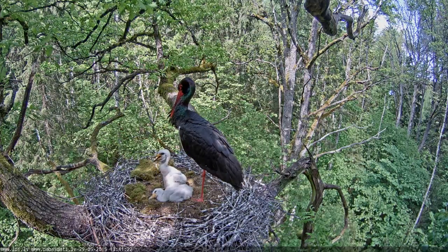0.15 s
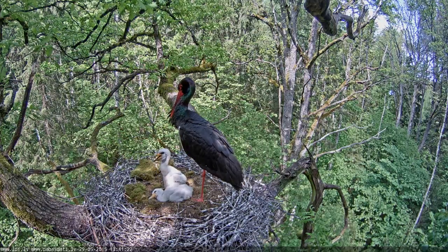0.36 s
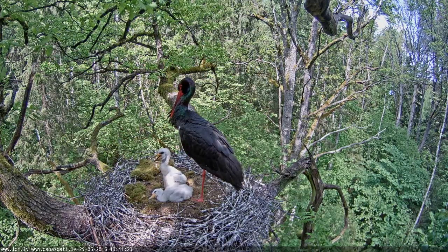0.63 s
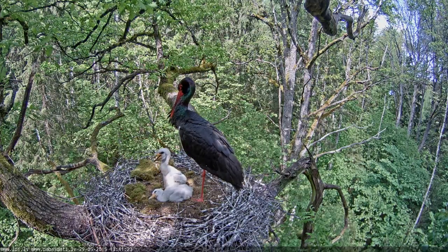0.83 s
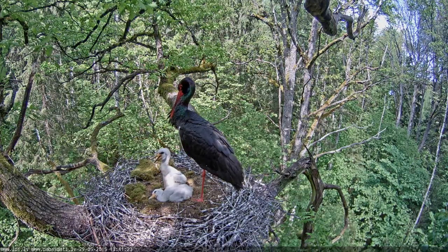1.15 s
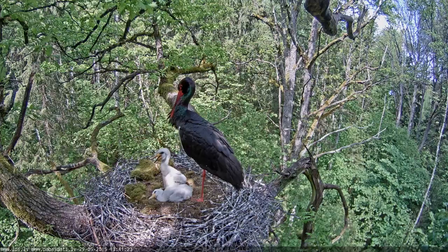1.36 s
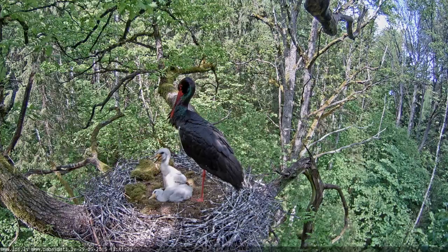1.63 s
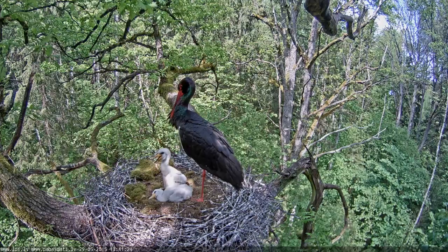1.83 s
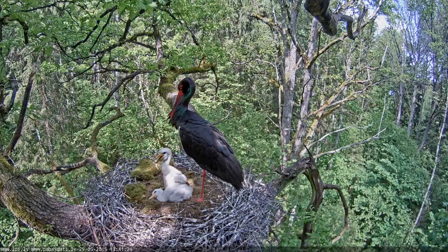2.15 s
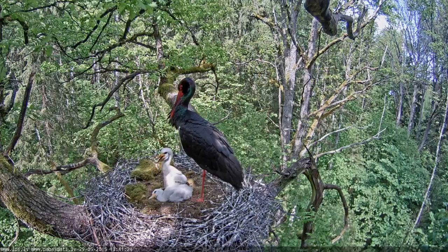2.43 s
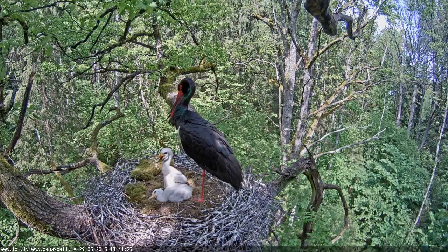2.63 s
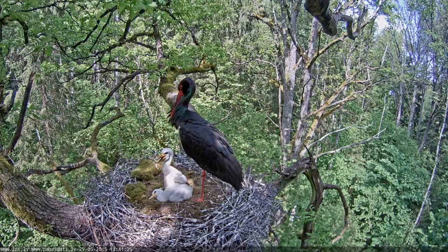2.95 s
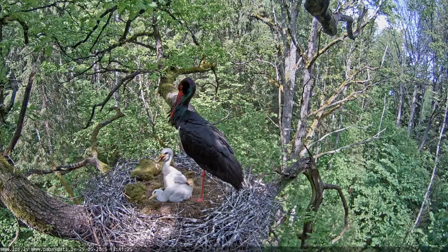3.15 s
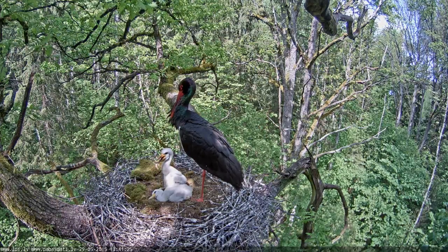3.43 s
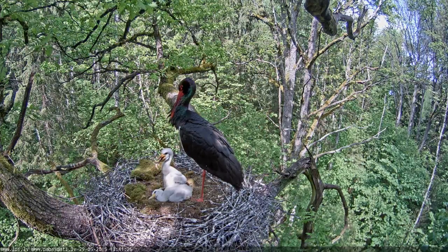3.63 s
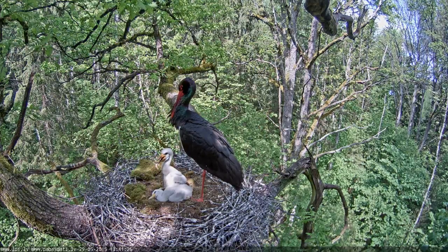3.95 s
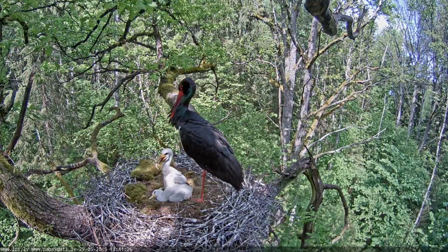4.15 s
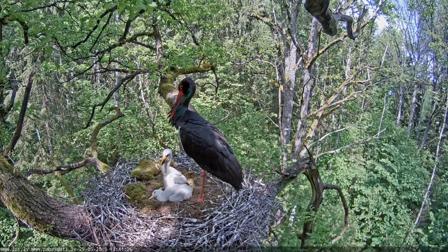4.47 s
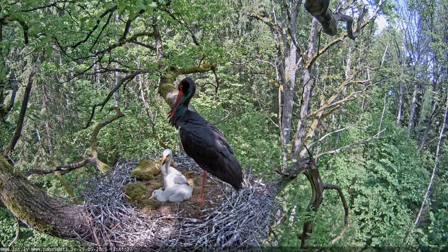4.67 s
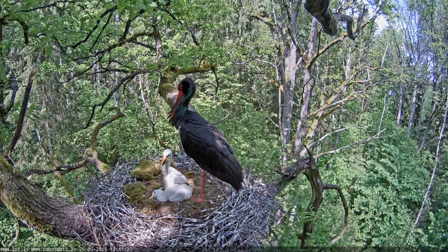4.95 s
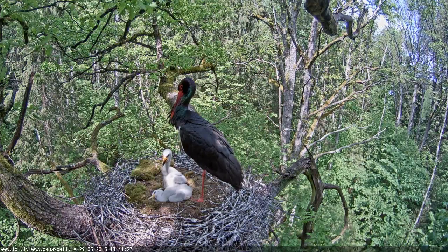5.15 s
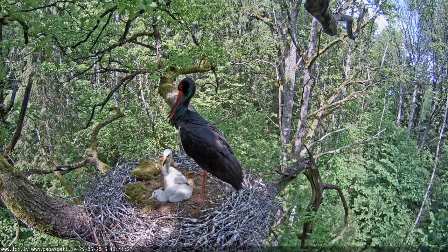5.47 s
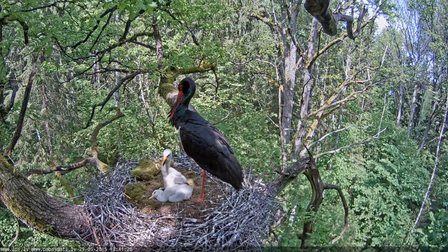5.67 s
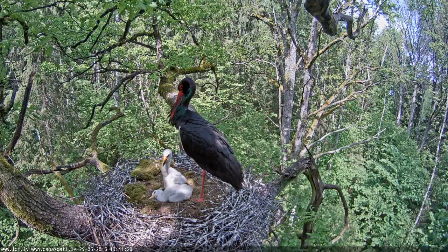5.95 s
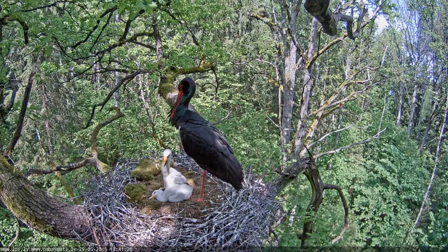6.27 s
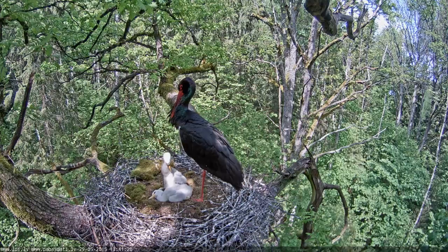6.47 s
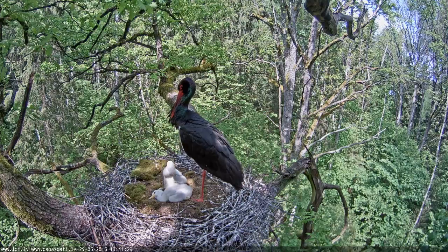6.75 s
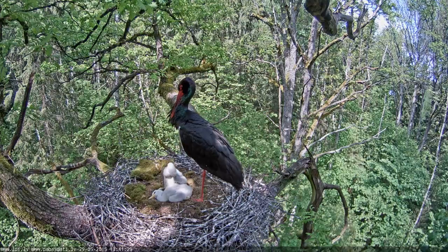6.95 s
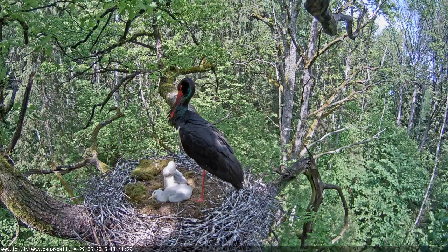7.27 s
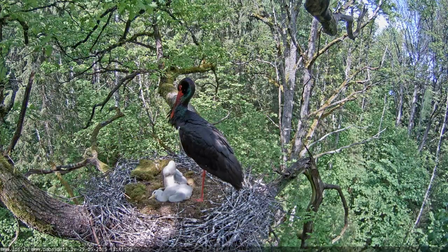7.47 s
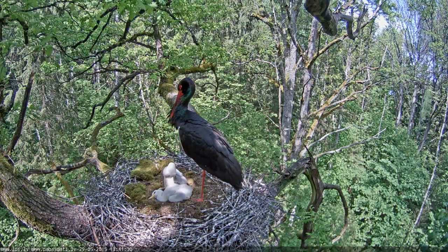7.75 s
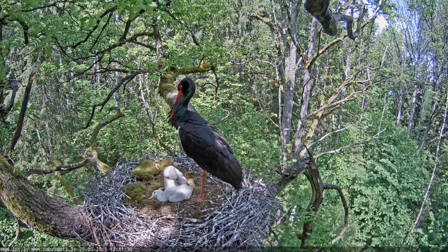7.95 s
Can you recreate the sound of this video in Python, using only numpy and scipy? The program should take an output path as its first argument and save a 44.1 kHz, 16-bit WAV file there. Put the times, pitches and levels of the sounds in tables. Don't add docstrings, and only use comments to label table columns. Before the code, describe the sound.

Steady hiss of leaves and a distant bird chorus lies under everything, with faint fast electrical ticking. Sparse thin calls lead into chopped churrs and quick leaping chirps, followed by bright, pure whistles close by that glide up and down. A high thin trill follows near the end. Tiny throat gulps and one low coo come from the stork nest beside the microphone, with woodland reverberation around.

```python
import sys
import numpy as np
from scipy import signal
from scipy.io import wavfile

SR = 44100
rng = np.random.default_rng(int(sys.argv[2]) if len(sys.argv) > 2 else 0)


def amplitude_ratio(level_db):
    exponent = np.asarray(level_db, float) / 20
    return 10 ** exponent


def file_out(sig):
    cols = np.atleast_2d(sig).T
    lim = np.clip(cols, -1, 1)
    pcm = np.round(lim * 32767).astype(np.int16)
    wavfile.write(sys.argv[1], SR, pcm)


N = 357651

GLIDE_BY_MIDDLE = 0.654


def at_hz(points, hz):
    points_hz, values = np.transpose(points)
    return np.interp(np.log(hz), np.log(points_hz), values)


def rms_one(x):
    return x / np.sqrt(np.mean(x ** 2) + 1e-20)


def energy_one(x):
    return x / np.sqrt(np.sum(x ** 2))


def drift(rate_hz, size):
    run_in = 4000
    r = np.exp(-2 * np.pi * rate_hz / SR)
    slow = signal.lfilter([1], [1, -2 * r, r * r], rng.standard_normal(size + run_in))
    return rms_one(slow[run_in:])


def bands(order=2):
    edges_hz = 16 * 2 ** (np.arange(31) / 3)
    return [(np.sqrt(a * b), signal.butter(order, [a, b], "band", fs=SR, output="sos"))
            for a, b in zip(edges_hz, edges_hz[1:])]


def add(out, start_s, hz, gain):
    at = round(start_s * SR)
    tone = np.sqrt(2) * gain * np.sin(2 * np.pi * np.cumsum(hz) / SR)
    out[at:at + len(tone)] += tone[:N - at]


def whistles():
    # time [share of length], glide [share done], level [dB re peak]
    arc = [(0, 0.016, -6), (.28, 0.419, -4), (.55, .95, -2.5), (.8, 1.05, -1.5), (1, 0.34, -13)]
    fade = [(0, 0, -11), (.15, 0.41, -2.5), (.6, .6, -5), (1, 0.66, -16)]
    flick = [(0, 0, -11), (.35, 0.5, -3.5), (1, 1, -3.5)]
    # start [t/s], length [t/s], first [f/Hz], last [f/Hz], peak [level/dB]
    arcs = [
        (3.94, 0.13, 1680, 2028, -48.5),
        (3.966, 0.11, 3420, 3595, -40),
        (3.99, .075, 5420, 5640, -67),
    ]
    fades = [
        (3.896, 0.05, 2613, 2668, -34.5),
    ]
    flicks = [
        (5.668, 0.032, 2740, 2396, -33.5),
        (5.677, 0.0243, 3994, 3330, -40),
        (6.067, 0.0119, 4505, 3250, -40),
        (6.131, 0.0093, 2350, 2590, -25.5),
    ]
    # [t/s], pitch [f/Hz], [level/dB]
    once = [
        [(3.675, 2890, -53), (3.7, 2770, -37.5), (3.712, 2710, -41), (3.73, 2694, -26.5), (3.739, 2580, -26.5),
         (3.747, 2617, -28), (3.762, 2582, -24), (3.775, 2634, -26.5), (3.788, 2535, -28)],
        [(5.728, 2300, -43), (5.74, 2507, -29), (5.757, 2754, -26), (5.77, 2834, -35.5), (5.785, 3170, -36)],
        [(5.826, 3330, -35), (5.838, 3050, -31), (5.847, 2875, -38), (5.858, 2855, -22), (5.862, 2840, -28),
         (5.868, 2880, -22.5), (5.875, 2800, -33), (5.881, 2955, -31), (5.895, 2990, -41)],
        [(6.086, 2930, -34), (6.093, 2575, -26), (6.1, 2423, -31.5), (6.104, 2295, -39), (6.112, 2110, -38),
         (6.124, 2070, -44), (6.13, 2224, -53)],
    ]
    drops = [
        [(4.279, 2646, -49), (4.287, 2714, -37.5), (4.299, 2520, -27), (4.311, 2390, -39), (4.317, 2240, -32.5),
         (4.337, 1880, -37), (4.343, 1780, -52), (4.349, 1899, -54)],
        [(4.903, 2840, -50), (4.917, 2683, -28), (4.933, 2536, -24), (4.943, 2410, -32), (4.953, 2010, -35.5),
         (4.967, 1826, -33.5), (4.98, 1830, -54)],
    ]
    rises = [
        [(4.461, 2520, -41), (4.473, 2600, -37), (4.522, 2720, -26), (4.538, 2870, -27.5), (4.562, 2920, -26.5),
         (4.574, 3030, -38.5), (4.596, 3100, -31), (4.62, 3220, -49), (4.7, 3170, -34.5)],
        [(5.102, 2480, -48), (5.117, 2650, -33), (5.14, 2720, -30.5), (5.166, 2815, -25.5), (5.186, 2900, -36),
         (5.218, 3030, -27), (5.25, 3150, -36.5), (5.28, 3220, -47), (5.344, 3130, -32.5)],
    ]
    shaped = []
    for shape, rows in [(arc, arcs), (fade, fades), (flick, flicks)]:
        for s, length, first, last, peak in rows:
            shaped.append([(s + length * u, first + (last - first) * glide, peak + under)
                           for u, glide, under in shape])
    return sorted(shaped + list(once) + list(drops) + list(rises), key=lambda note: note[0][0])


def whistler():
    turned_away = [-13, -3.5, -2, -8.5, -10.0, -10, -7, -10, -6.5, -5, 1, -9.5, -7, -5, -8.5, -21]
    away_swing = 0.58
    here, away = np.zeros(N), np.zeros(N)
    for note, away_db in zip(whistles(), turned_away):
        s, hz, level_db = np.transpose(note)
        t = np.arange(s[0], s[-1], 1 / SR)
        gate = np.clip(np.minimum(t - s[0], s[-1] - t) / .003, 0, 1)
        tone = np.zeros(N)
        add(tone, s[0], np.interp(t, s, hz), gate * amplitude_ratio(np.interp(t, s, level_db)))
        below_peak_db = np.interp(t, s, level_db - level_db.max())
        evened = np.zeros(N)
        evened[round(s[0] * SR):][:len(t)] = amplitude_ratio((away_swing - 1) * below_peak_db)
        here = here + tone
        away = away + amplitude_ratio(away_db - 2.0) * evened * tone
    return here, away


def sing(rows, wobble, wobble_hz=60, buzz=0., buzz_hz=120, sweep=0., edge=.2):
    out, waver = np.zeros(N), drift(wobble_hz, N)
    for start_s, length_s, first_hz, middle_hz, last_hz, level_db in rows:
        u = np.linspace(0, 1, round(length_s * SR))
        cycle = 2 * np.pi * buzz_hz * length_s * u
        at = min(round(start_s * SR), N - len(u))
        hz = np.polyval(np.polyfit([0, .5, 1], [first_hz, middle_hz, last_hz], 2), u)
        hz = hz * (1 + wobble * waver[at:][:len(u)] - sweep * np.cos(cycle))
        swell = np.sin(np.pi / 2 * np.clip(np.minimum(u, 1 - u) / edge, 0, 1))
        chop = 1 + np.clip(buzz, 0, 1) * np.sin(cycle)
        add(out, start_s, hz, amplitude_ratio(level_db) * swell * chop)
    return out


def glides(rows, by_middle=GLIDE_BY_MIDDLE):
    return [(s, length, first, first + by_middle * (last - first), last, level)
            for s, length, first, last, level in rows]


def syllables(strands, sung, by_middle=GLIDE_BY_MIDDLE):
    rows = [(s + slow * after, slow * length, up * first, up * last, level + rel)
            for s, level, up, slow in sung
            for after, length, first, last, rel in strands]
    return glides(rows, by_middle)


def held(rows, start=0.99):
    return glides([(s, length, start * hz, hz, level) for s, length, hz, level in rows])


def warbler_leaps():
    leaps = [(1.345, 0.0077, 2140, 2600, -36), (1.356, 0.014, 2800, 2640, -38),
             (1.38, .026, 2720, 2700, -49), (1.404, 0.013, 3440, 3150, -41.5),
             (1.405, .012, 1690, 2000, -52), (1.485, 0.016, 1700, 1840, -51),
             (1.494, 0.02, 2800, 3780, -42.5), (1.504, 0.036, 2630, 3300, -50),
             (1.588, 0.014, 2600, 2310, -44), (1.652, 0.016, 3100, 3560, -42),
             (1.258, .01, 2400, 2900, -46), (1.31, .012, 2950, 3150, -52), (1.2, .02, 2350, 2500, -48),
             (2.562, 0.02, 2450, 2650, -42), (2.435, .012, 1700, 1850, -50),
             (2.678, 0.014, 3550, 3850, -52), (2.625, 0.01, 2850, 3100, -54),
             (2.875, .025, 3100, 3700, -50), (2.672, 0.055, 2660, 2400, -49),
             (2.281, 0.016, 3850, 3900, -57), (2.72, .012, 3600, 3150, -45), (3, 0.038, 4370, 4000, -59),
             (2.755, 0.0186, 2940, 3730, -41), (2.778, 0.021, 3550, 3030, -46),
             (2.846, 0.017, 2300, 3100, -41.5)]
    strokes = [
        (1.585, 0.042, 4480, 4020, -53),
        (2.49, 0.018, 4370, 3930, -50),
        (2.595, 0.024, 1630, 2060, -49),
        (2.597, 0.014, 2930, 3330, -40),
        (2.628, 0.0087, 4000, 3200, -41.5),
        (5.971, .014, 5800, 4150, -53),
        (6.415, 0.0215, 3090, 2440, -45.5),
        (7.81, 0.0096, 2460, 2850, -47),
        (7.895, 0.012, 2490, 2900, -48),
    ]
    rows = glides(leaps, by_middle=0.66) + glides(strokes)
    return sing(rows, wobble=.012, wobble_hz=170, buzz=.35, buzz_hz=110)


def warbler_churrs():
    strands = [(2.581, .022, 2600, 2720, -39), (1.5, 0.0306, 3500, 3800, -49),
               (1.67, .045, 2900, 3000, -49), (2.8, 0.051, 2950, 3200, -49), (1.5, 0.033, 2650, 2700, -48),
               (1.555, .03, 3000, 3100, -50), (2.525, 0.02, 2700, 2750, -48),
               (2.76, 0.057, 3700, 3760, -50.5), (2.74, 0.052, 3150, 3250, -46),
               (1.52, 0.021, 3900, 3340, -45), (1.608, 0.0456, 2400, 2680, -40),
               (1.62, 0.046, 1800, 1900, -49.5), (1.664, 0.026, 3600, 3350, -42),
               (1.698, 0.047, 2520, 2420, -41.5), (1.69, .06, 1750, 1900, -53.5),
               (1.735, 0.032, 2550, 3000, -48), (1.71, 0.048, 3450, 3250, -46),
               (1.758, 0.0295, 3250, 3750, -45.5), (1.788, 0.04, 3550, 3550, -51),
               (2.712, .05, 1740, 2050, -48.5), (2.762, .03, 2000, 1800, -51),
               (2.72, 0.034, 2450, 2680, -38.5), (2.885, 0.033, 2200, 1900, -51),
               (2.8, 0.038, 2620, 2450, -48), (2.835, 0.05, 1800, 2070, -47.5),
               (2.86, 0.039, 2960, 3750, -46), (2.92, 0.0298, 2900, 3624, -49)]
    # after [t/s], length [t/s], first [f/Hz], last [f/Hz], [level/dB]
    long_churr = [
        (0, 0.055, 2680, 2597, 0),
        (.056, .018, 2555, 2850, 0),
    ]
    # start [t/s], [level/dB], pitch factor [1], length factor [1]
    long_sung = [
        (1.42, -39, 1.015, 0.996),
    ]
    short = sing(glides(strands), wobble=.018, wobble_hz=120, buzz=.9, buzz_hz=125, sweep=.03)
    long = sing(syllables(long_churr, long_sung), wobble=.015, wobble_hz=90, buzz=.35, buzz_hz=50, sweep=.022)
    return short + long


def warbler_steady():
    level_notes = [(1.165, 0.03, 4260, -58), (1.362, 0.044, 2197, -42), (1.503, 0.018, 2120, -46),
                   (1.745, 0.033, 2140, -43.5), (2.281, 0.015, 2460, -46), (2.46, 0.031, 2322, -34.5),
                   (2.535, 0.031, 2294, -48), (2.612, 0.02, 4090, -47.5), (3.725, 0.067, 2090, -54),
                   (6.862, 0.048, 3620, -57), (7.088, .045, 3650, -56.5), (.12, .075, 3380, -54),
                   (.23, .055, 3370, -52), (.165, .03, 4000, -56), (.82, .1, 3760, -58)]
    # after [t/s], length [t/s], first [f/Hz], last [f/Hz], [level/dB]
    pickup = [
        (-.026, 0.019, 2300, 2620, -14),
        (0, 0.015, 2340, 2760, 4),
        (.021, 0.012, 2800, 2850, -3.5),
    ]
    # start [t/s], [level/dB], pitch factor [1], length factor [1]
    pickup_sung = [
        (2.439, -35, 1.01, 0.76),
    ]
    rows = held(level_notes) + syllables(pickup, pickup_sung)
    return sing(rows, wobble=.005, wobble_hz=80, buzz=.2, buzz_hz=95)


def brisk_syllables():
    # after [t/s], length [t/s], first [f/Hz], last [f/Hz], [level/dB]
    opening = [
        (0, 0.013, 4520, 4420, -4),
        (.032, .008, 7100, 5600, -14),
        (.034, 0.011, 5480, 5400, -5.5),
        (.042, .008, 4800, 4300, 0.5),
        (.05, 0.0157, 4250, 3580, -2),
        (.064, 0.011, 3600, 3550, -4),
    ]
    chip = [
        (-.016, 0.0236, 2350, 2400, -5.5),
        (.002, 0.01, 2700, 3740, -0.5),
        (.008, .008, 3600, 3500, -3.5),
        (.006, 0.014, 1600, 2060, -5.5),
        (.02, .012, 1800, 1750, -9),
        (.014, .014, 4250, 4450, -6),
        (.027, 0.01, 4200, 3900, -1.5),
    ]
    # start [t/s], [level/dB], pitch factor [1], length factor [1]
    songs = [
        (6.394, -51.5, 1.01, 1.05),
        (7.787, -52.5, .99, .95),
    ]
    chips = [
        (1.189, -44.5, 1.01, 1.1),
        (2.268, -45, .99, .9),
    ]
    far_sweeps = [
        (.245, 0.015, 4500, 3870, -51),
        (.338, 0.0215, 2640, 3020, -53),
        (.36, 0.037, 2900, 3070, -52),
        (.415, 0.022, 4100, 4450, -55),
        (.535, 0.028, 3950, 3600, -58),
        (.587, 0.011, 4600, 4150, -56),
        (.632, 0.031, 3120, 3380, -52),
        (.745, 0.026, 5150, 4150, -59),
        (.81, 0.036, 3640, 3740, -56),
        (7.468, 0.055, 3550, 3380, -55),
    ]
    rows = syllables(opening, songs, by_middle=0.573) + syllables(chip, chips) + glides(far_sweeps)
    return sing(rows, wobble=.022, wobble_hz=220, buzz=.45, buzz_hz=130)


def twitter_trill():
    trill = [(6.53, 0.06, 5300, -65), (6.515, 0.026, 6600, -59), (6.535, .05, 6380, -58.5),
             (6.545, 0.018, 7200, -56), (6.59, 0.061, 5500, -66), (6.6, 0.073, 6140, -64),
             (6.625, 0.072, 7240, -61), (6.67, .025, 6400, -65), (6.73, 0.016, 6580, -60),
             (6.73, 0.066, 7300, -62), (6.765, .015, 7900, -66), (6.88, 0.04, 5600, -68),
             (6.89, 0.065, 7250, -59), (6.89, 0.014, 6420, -61), (6.925, .02, 8020, -62),
             (7.82, 0.024, 6440, -64), (7.905, 0.048, 5420, -58), (7.905, 0.018, 4560, -58),
             (7.935, 0.031, 6740, -59), (7.95, 0.046, 4950, -68), (7.97, 0.037, 6100, -62),
             (8.02, .025, 5720, -59), (8.02, 0.064, 7170, -57.5), (8.04, 0.055, 6290, -64),
             (8.06, 0.045, 5400, -71)]
    return sing(held(trill), wobble=.027, wobble_hz=330, buzz=.7, buzz_hz=70, sweep=.015)


def far_calls():
    level_calls = [(.08, 0.02, 4400, -60), (.35, 0.051, 3870, -59), (.95, 0.035, 2900, -64),
                   (1.0, 0.045, 2850, -59), (.36, .07, 3420, -64), (1.21, .018, 5250, -64),
                   (2.2, 0.053, 3750, -60.5), (3.26, 0.05, 3780, -59.5), (3.74, 0.09, 3740, -57),
                   (7.52, 0.037, 3400, -60), (7.61, .04, 3450, -61), (7.8, .04, 3480, -61),
                   (7.56, 0.061, 3460, -60), (7.66, 0.071, 3436, -58.5), (7.745, 0.071, 3460, -58.5),
                   (7.85, .035, 3430, -63)]
    falling = [
        (.09, 0.038, 4640, -62),
        (.442, 0.05, 4680, -61),
        (.91, 0.038, 4500, -65),
        (2.52, .06, 4600, -63.5),
        (2.875, 0.033, 4550, -60),
        (3.56, 0.06, 4200, -63),
    ]
    piping = [
        (1.238, .04, 4950, -61.5),
        (1.305, 0.027, 5050, -66),
        (1.67, 0.037, 4860, -59.5),
        (1.78, .05, 4780, -65),
        (1.855, 0.042, 4940, -61),
        (5.985, 0.036, 4580, -55),
    ]
    out = sing(held(level_calls), wobble=.017, wobble_hz=70, buzz=.6, buzz_hz=55)
    out = out + amplitude_ratio(-2) * sing(held(falling, start=1.075), wobble=.012, wobble_hz=110, buzz=.5, buzz_hz=90)
    return out + sing(held(piping), wobble=.003, buzz=.3, buzz_hz=40)


def gulps():
    swallowed = [(.205, 0.015, 870, -57), (0.251, 0.013, 936, -52.5), (0.608, 0.014, 1530, -53),
                 (1.058, 0.016, 900, -56), (2.379, 0.01, 670, -55), (2.825, 0.049, 549, -53),
                 (3.143, 0.019, 915, -53), (3.638, 0.022, 837, -57), (4.359, 0.018, 890, -55),
                 (4.57, 0.045, 835, -54), (5.001, .018, 734, -56), (5.534, 0.022, 857, -52),
                 (5.594, 0.019, 670, -54), (6.842, 0.014, 1334, -50), (6.994, 0.0106, 1280, -49),
                 (7.21, 0.012, 820, -56), (7.444, 0.012, 1300, -50), (7.449, 0.012, 880, -52),
                 (7.619, 0.042, 513, -57), (7.867, 0.011, 1980, -51), (7.873, 0.011, 690, -54),
                 (7.868, 0.011, 1320, -51)]
    octave_s = .055
    rows = [(s, length, hz, hz * 2 ** (length / octave_s) ** 2, level) for s, length, hz, level in swallowed]
    return glides(rows, by_middle=0.393)


def nest_voices():
    coo = [
        (.322, 0.026, 913, 1590, -49.5),
        (1.507, 0.0446, 420, 518, -42),
        (1.552, .026, 520, 560, -52),
    ]
    return sing(gulps() + glides(coo, by_middle=0.22), wobble=0.02, edge=0.1)


def branches(x, t60_s, level_db):
    t = np.arange(round(.12 * SR)) / SR
    early = rng.standard_normal(len(t)) * amplitude_ratio(-60 * t / t60_s)
    return x + amplitude_ratio(level_db) * signal.fftconvolve(x, energy_one(early))[:N]


def forest(x, onset_s):
    # [f/Hz], t60 [t/s]
    decay = [(500, 0.57), (2000, 0.64), (3000, 1.23), (4000, 2.02), (5000, 1.03), (8000, 0.43)]
    t = np.arange(round(1.6 * SR)) / SR
    white = rng.standard_normal((2, len(t)))
    tail = np.zeros(len(t))
    for k, (hz, sos) in enumerate(bands()):
        tail = tail + signal.sosfilt(sos, white[k % 2]) * amplitude_ratio(-60 * t / at_hz(decay, hz))
    tail = tail * (1 - np.exp(-t / onset_s))
    return signal.fftconvolve(x, energy_one(tail))[:N]


def hiss():
    # [f/Hz], density [level/dB per Hz]
    spectrum = [(15, 0.5), (30, -9.5), (60, -12), (200, -14.5), (500, -17.5), (900, -19.5), (1500, -16),
                (2300, -13.5), (2900, -9.5), (3650, -16), (4600, -27), (5300, -32), (7000, -33),
                (14000, -34.5)]
    # [t/s], whole chorus [level/dB], extra for its highest voices [level/dB]
    chorus = [(0, 1, 4), (.6, 0, -0.5), (1.2, 1, 1.5), (2, 0, 3.5), (3, -0.5, -1.5), (3.6, 0, -1),
              (4.4, 1.5, -2), (5, 3.5, -5), (5.7, 3, -3), (6.4, 0, -3), (7.1, -2.5, -1.5), (7.6, -1.5, -2),
              (8.11, -3, 3)]
    out, white = 0, rng.standard_normal((2, N + SR))
    s, chorus_db, highest_db = np.transpose(chorus)
    t = np.arange(N) / SR
    swell_db, upper_db = np.interp(t, s, chorus_db), np.interp(t, s, highest_db)
    coarse = N // 50 + 2
    for k, (hz, sos) in enumerate(bands(order=3)):
        share = np.exp(-.5 * (np.log2(hz / 3200) / 0.47) ** 2)
        upper = np.exp(-.5 * (np.log2(hz / 4660) / 0.21) ** 2)
        flicker_db = np.interp(np.arange(N) / 50, np.arange(coarse), drift(700, coarse))
        level_db = at_hz(spectrum, hz) + share * (swell_db + flicker_db) + upper * upper_db
        out = out + signal.sosfilt(sos, white[k % 2])[SR:] * amplitude_ratio(level_db)
    return amplitude_ratio(-47.5) * rms_one(out)


def clock_ticks(level_db, spread_db):
    # [t/s], shift [t/ms]
    wander = [(0, 2.7), (1.3, -.9), (2.1, -1.8), (3.3, -1.1), (4.9, .5), (6.6, 1.1), (8.11, .6)]
    first_s, period_s, jitter_s = .02724, .032796, .001
    s = np.arange(first_s, N / SR - .01, period_s)
    chance = rng.uniform(-0.99, 1, (len(s), 2))
    s = s + np.interp(s, *np.transpose(wander)) / 1000 + jitter_s * chance[:, 0]
    spikes = np.zeros(N)
    spikes[(s * SR).astype(int)] = -amplitude_ratio(level_db + spread_db * chance[:, 1])
    return signal.sosfilt(signal.butter(1, [1500, 10000], "band", fs=SR, output="sos"), spikes)


def scene():
    near, away = whistler()
    leaps, churrs, steady = warbler_leaps(), warbler_churrs(), warbler_steady()
    brisk, high, far, nest = brisk_syllables(), twitter_trill(), far_calls(), nest_voices()

    close = branches(amplitude_ratio(.7) * near, t60_s=.1, level_db=-16)
    close = close + branches(steady, t60_s=.06, level_db=-14) + amplitude_ratio(-1.5) * nest
    beyond = amplitude_ratio(-0.5) * leaps + amplitude_ratio(-0.5) * churrs + amplitude_ratio(2.5) * far + amplitude_ratio(-2.5) * high + amplitude_ratio(1.5) * brisk
    beyond = branches(beyond, t60_s=.09, level_db=-10)

    scatter = forest(away + amplitude_ratio(-13.0) * nest, onset_s=0.0026)
    to_trees = amplitude_ratio(-4.5) * leaps + amplitude_ratio(-8.5) * steady + amplitude_ratio(-3.5) * churrs
    to_trees = to_trees + amplitude_ratio(0.5) * far + amplitude_ratio(-5.0) * high + amplitude_ratio(-5.0) * brisk
    distant = forest(to_trees, onset_s=0.0022)
    ticks = clock_ticks(level_db=-37.5, spread_db=-1.5)
    return (close + beyond + scatter + distant + hiss() + ticks)[None]


def top_cut(x):
    return signal.sosfilt(signal.butter(12, 14220, fs=SR, output="sos"), x)


def record(dry):
    low_pass = signal.ellip(10, .1, 60, 13900, fs=SR, output="sos")
    offset = .0057
    return top_cut(signal.sosfilt(low_pass, dry) + offset)


dry = scene()
out = record(dry)
file_out(out)
```